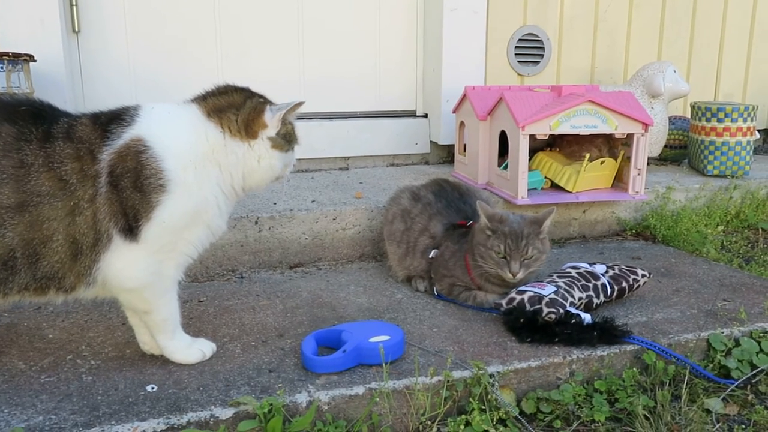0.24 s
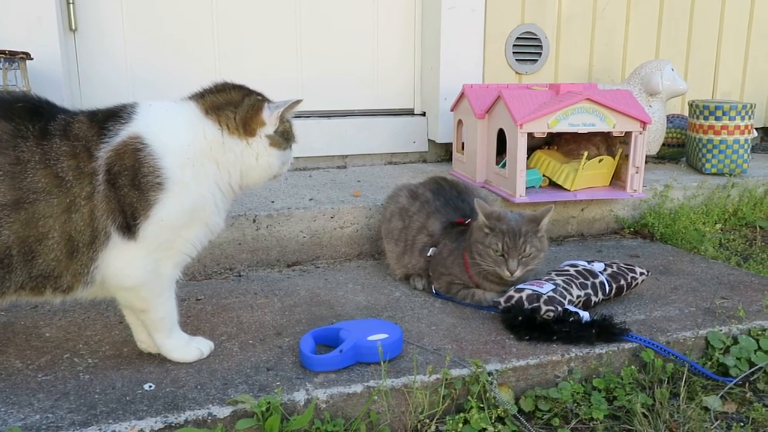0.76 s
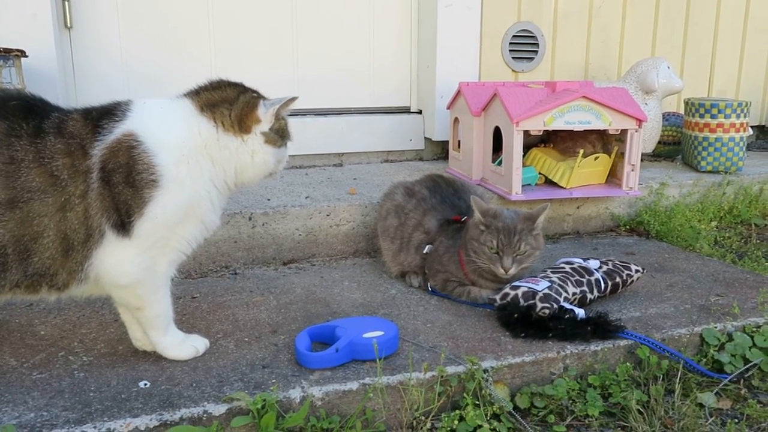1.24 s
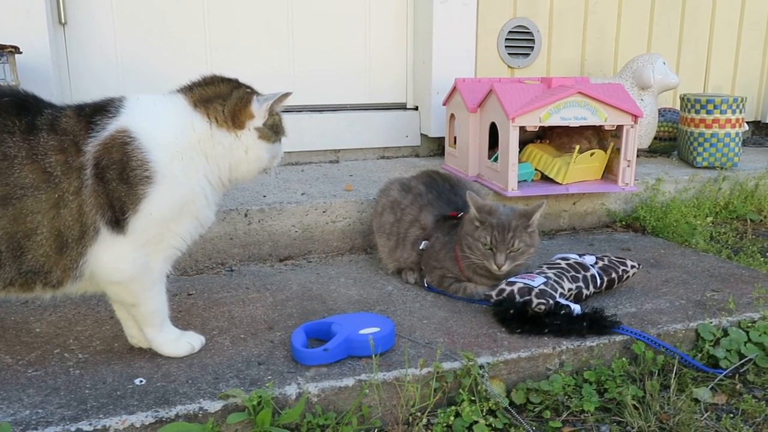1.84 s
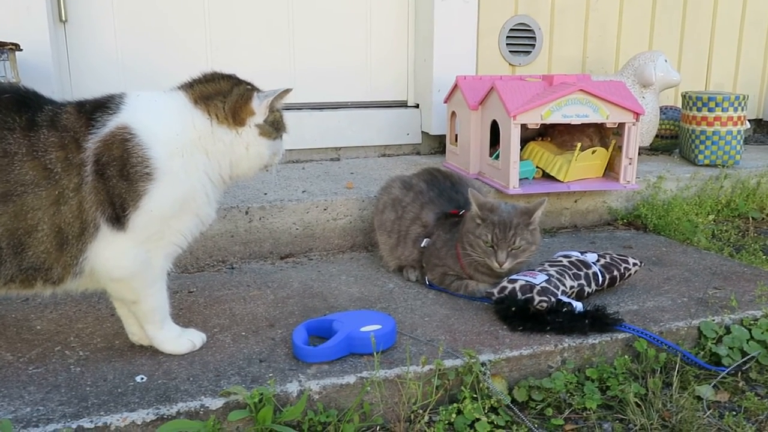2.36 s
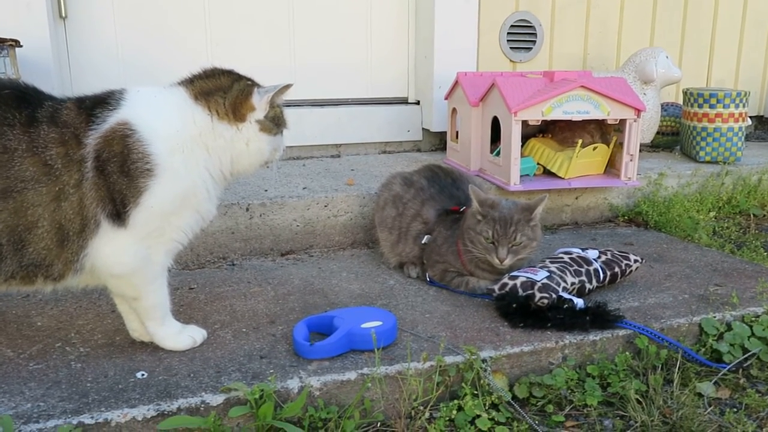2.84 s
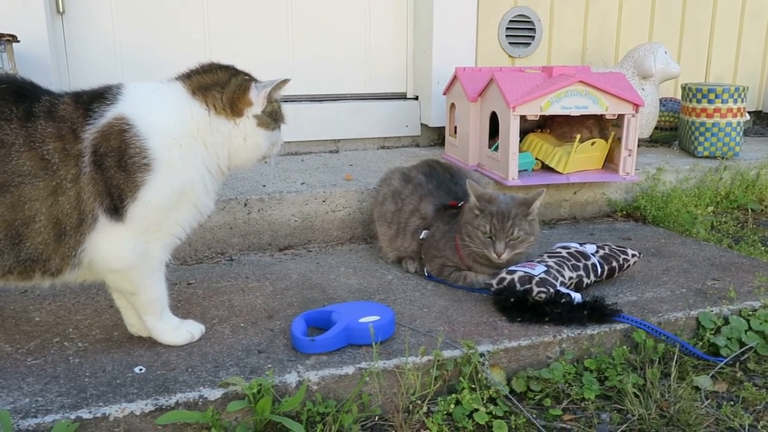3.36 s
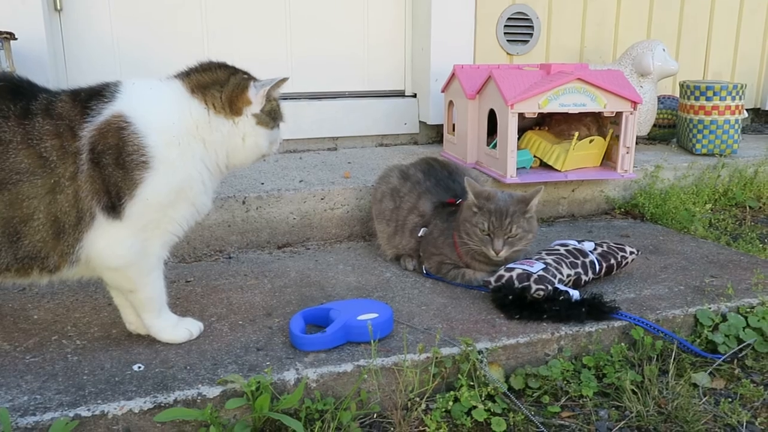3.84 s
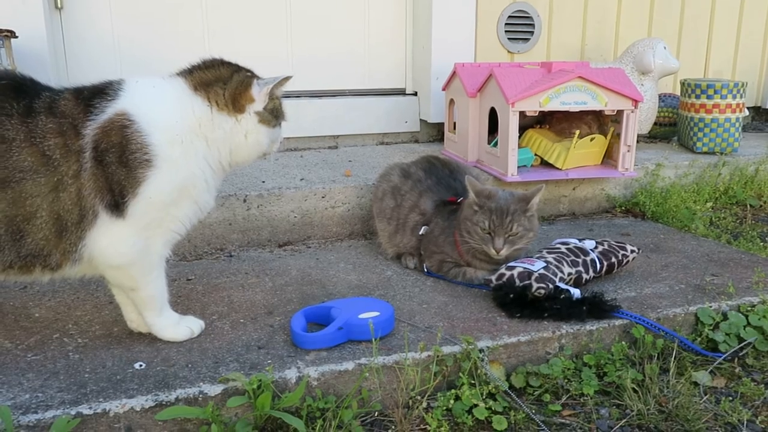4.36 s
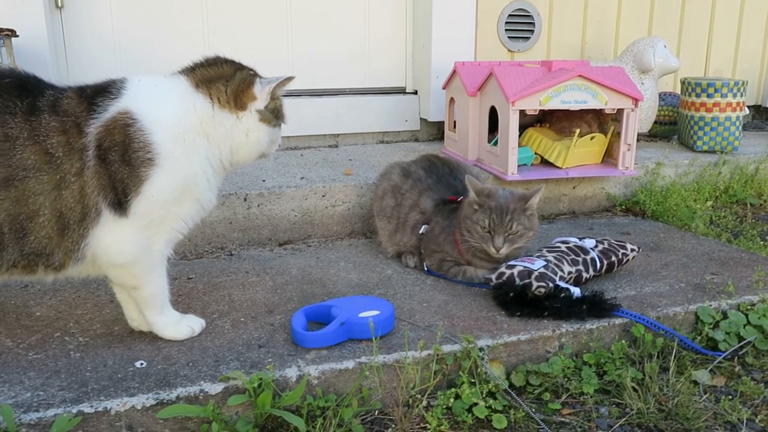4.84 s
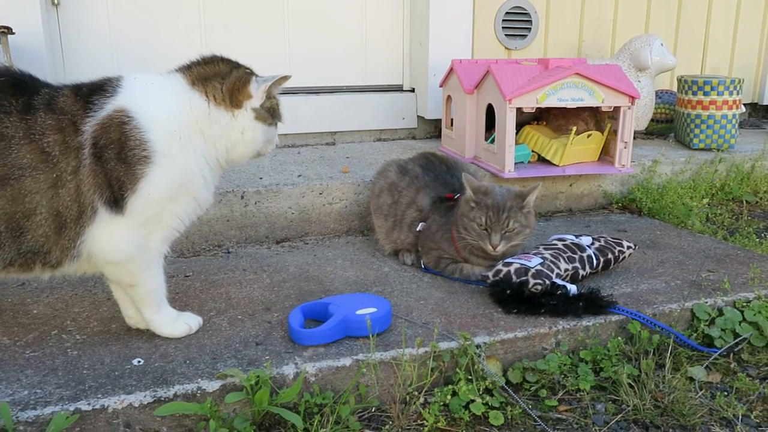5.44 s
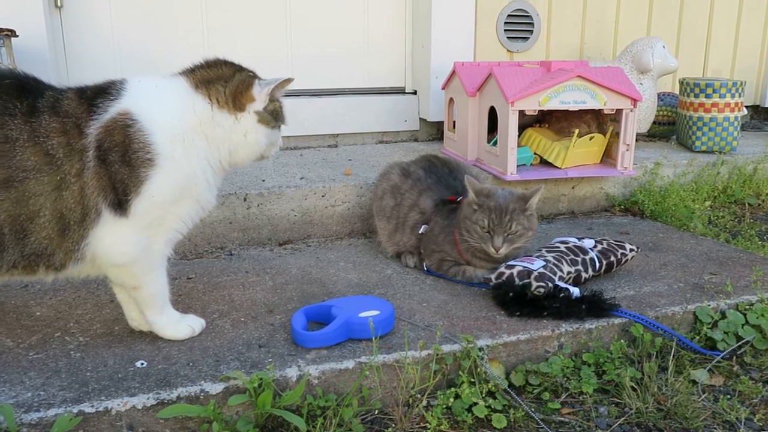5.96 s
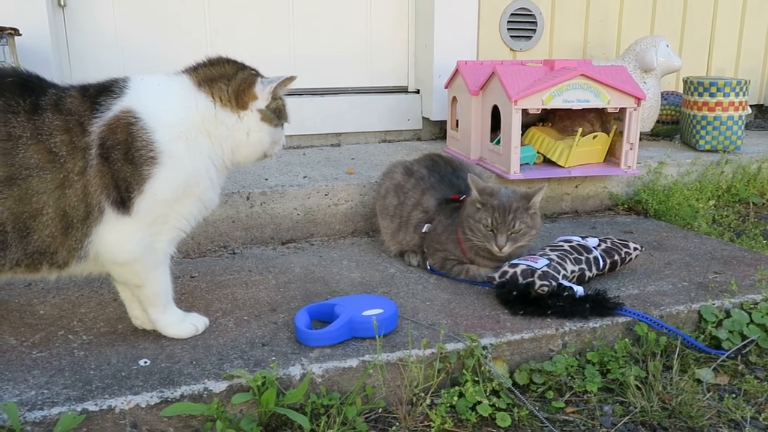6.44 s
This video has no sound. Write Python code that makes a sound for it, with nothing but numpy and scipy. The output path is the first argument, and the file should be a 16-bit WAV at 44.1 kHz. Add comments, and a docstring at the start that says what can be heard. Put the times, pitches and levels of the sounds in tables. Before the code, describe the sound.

Two cats face off on a concrete step: tense raspy wails, a fluttering growl and a humming moan, over wind buffeting and faint birds.

```python
"""Two cats outdoors in a breeze

One cat cries three times on a concrete step: clean harmonics that rasp at each start and flick up at each
end, with air let out as a cry closes. The first cry is already under way at 0 s; the end cuts the third.
A second cat growls (noise puffs ringing a chest) and glides up into a shut-mouthed moan. Wall and step lift
some pitches and cancel others. Wind buffets a two-port microphone over shaped-noise hiss, a thin whine,
gliding bird whistles and grainy rustles."""
import sys
import numpy as np
from scipy import signal
from scipy.fft import rfft, irfft, next_fast_len
from scipy.io import wavfile
from scipy.ndimage import uniform_filter1d, map_coordinates

SR = 44100
rng = np.random.default_rng(int(sys.argv[2]) if len(sys.argv) > 2 else 0)


def file_out(sig):
    """Save sig as 16-bit WAV at sys.argv[1]."""
    # one column per channel
    cols = np.atleast_2d(sig).T
    # limit, then scale
    lim = np.clip(cols, -1, 1)
    pcm = np.round(lim * 32767).astype(np.int16)
    wavfile.write(sys.argv[1], SR, pcm)


N = 295911

ATTACK_S = 0.0091  # swell ahead of each cry


def amp(db):
    """dB to gain."""
    return 10 ** (np.asarray(db) / 20)


def unit(x):
    """Scaled to rms 1."""
    return x / np.sqrt(np.mean(x ** 2) + 1e-20)


def along(points, hz):
    """(Hz, value) points interpolated on a log frequency axis."""
    f, v = np.transpose(points)
    return np.interp(np.log(hz + 1), np.log(f + 1), v)


def curves(rows):
    """One value per sample for each column after the time."""
    s, *cols = np.transpose(rows)
    return [np.interp(np.arange(N) / SR, s, c) for c in cols]


def spans(tables, fade_s):
    """1 while a table runs, 0 between, with soft edges."""
    t = np.arange(N) / SR
    on = sum((t > rows[0][0] - fade_s) & (t < rows[-1][0] + fade_s) for rows in tables) > 0
    return abs(uniform_filter1d(on * 1., round(fade_s * SR) + 1))


def wobble(rate_hz):
    """A smooth random curve, rate_hz knots a second."""
    knots = rng.standard_normal(int(N * rate_hz / SR) + 4)
    return map_coordinates(knots, [np.arange(N) * rate_hz / SR])


def filtered(x, response):
    """x times a complex response of frequency."""
    m = next_fast_len(N + SR // 2)
    return irfft(rfft(x, m) * response(np.fft.rfftfreq(m, 1 / SR)), m)[..., :N]


def resonant(x, modes):
    """x through parallel (Hz, width Hz, dB) resonances of alternating sign."""
    def response(f):
        total = 0
        for k, (centre, width, db) in enumerate(modes):
            damping = 1j * f * width
            total = total + (-1) ** k * amp(db) * damping / (centre ** 2 - f ** 2 + damping)
        return total
    return filtered(x, response)


def rush(spectrum, patchy_db):
    """Noise of rms 1 with time-frequency patches of random gain."""
    z = signal.stft(rng.standard_normal(N), nperseg=512)[2]
    field = rng.standard_normal(z.shape)
    field = uniform_filter1d(uniform_filter1d(field, 6, 0), 12, 1)
    noise = signal.istft(z * amp(patchy_db * unit(field)), nperseg=512)[1][:N]
    return unit(filtered(noise, lambda hz: amp(along(spectrum, hz))))


def echoes(x, wet_db, t60_s):
    """x with the blurred answer of the house wall and the step: a decaying noise tail."""
    t = np.arange(SR // 4) / SR
    tail = rng.standard_normal(len(t)) * amp(-60 * t / t60_s)
    return x + amp(wet_db) * signal.fftconvolve(x, tail / np.linalg.norm(tail))[:N]


def shaped(rows):
    """A cry with its attack before; after it the mouth shuts, pitch flicks up, level releases."""
    attack_db = -28
    shut_s, shut_db = .009, -32  # the mouth closes early in the flick
    flick_s, flick_hz, flick_db = .023, 119.9, 0.5
    release_s, release_db = 0.0262, -23
    (start, hz, db, mouth), (end, last_hz, last_db, _) = rows[0], rows[-1]
    attack = (start - ATTACK_S, hz, db + attack_db, mouth)
    shut = (end + shut_s, last_hz + flick_hz * shut_s / flick_s, last_db, shut_db)
    flick = (end + flick_s, last_hz + flick_hz, last_db + flick_db, shut_db)
    release = (flick[0] + release_s, last_hz + flick_hz / 2, last_db + release_db, shut_db)
    return [attack, *rows, shut, flick, release]


def voice(tables, path, jitter):
    """Pitch, overtone level, cycle angle, gate and makers of clean partials for one cat."""
    pitch_hz, effort_db, mouth_db = curves(np.vstack(tables))
    turn = 2 * np.pi * np.cumsum(pitch_hz * (1 + jitter * wobble(60))) / SR
    sounding = spans(tables, 0.0028)

    def partial(k, db, shake_db):
        level = np.sqrt(2) * amp(db + shake_db * wobble(50))
        return sounding * level * np.cos(k * turn)

    def low(k, shake_db):
        db = effort_db + (k - 1) * mouth_db + along(path, k * pitch_hz)
        return partial(k, db, shake_db)

    return pitch_hz, effort_db + np.minimum(mouth_db, 0), turn, sounding, partial, low


def yowl():
    """Clean fold harmonics; the second is apart, since it reaches the ports from the side."""
    # One table per cry. Each row: time in seconds, pitch in Hz, effort in dB,
    # mouth in dB per overtone step (higher = more open, brighter overtones).
    cries = [
        [(-.4, 550, -50, 0), (0, 547.4, -47.5, 0), (.25, 530.3, -46.5, 0), (.31, 512.4, -44.5, 0),
         (.45, 515.6, -47, 0), (.553, 522.7, -47.5, 0)],
        [(3.778, 646.5, -43, -2.5), (3.792, 624, -46.5, 7), (3.814, 670, -41, -0.5), (3.826, 698, -41, -2.5),
         (3.85, 694, -40, -2), (3.864, 736, -40, -2.5), (3.92, 744.5, -39, -1.5), (4.0, 753, -46.5, -26),
         (4.015, 746, -46.5, -1.5), (4.043, 708, -40.5, -26), (4.06, 652, -46.5, -15), (4.09, 711, -42.5, -32),
         (4.135, 718.6, -47, -34), (4.165, 674, -45.5, -34), (4.25, 585.5, -42.5, -31),
         (4.36, 569.4, -45.5, -19), (4.43, 586.5, -44, -24), (4.54, 564, -46, -8), (4.6, 551, -50, -6),
         (4.633, 566, -50, -10)],
        [(6.602, 623.5, -42, -3), (6.623, 610, -39.5, -1.5), (6.632, 652, -45, 0), (6.642, 671.6, -46, 1.5),
         (6.654, 673, -42, -0.5), (6.664, 716, -38.5, -9), (6.673, 741, -40, -3), (6.71, 740, -41, -2.5)],
    ]
    # Mouth colour of the high overtones. Each row: frequency in Hz, relative level in dB.
    mouth_colour = [(2480, -2), (2780, -13), (3550, -10), (3750, -7), (3950, 0), (4300, 0), (4520, -17),
                    (5150, -13), (6200, -19), (8000, -50)]
    # Gain from throat, wall and step on the low harmonics. Each row: frequency in Hz, gain in dB.
    cry_path = [(513, -11), (546, -0.5), (612, -5.5), (668, 2.5), (706, -15), (728, -1.5), (748, 2),
                (1030, -4.5), (1090, -8.5), (1250, 2.5), (1330, -2.5), (1390, 3.5), (1480, -5), (1545, -18),
                (1640, -4.5), (1870, -9), (1990, 11), (2090, -12.5), (2220, -28)]
    # high overtones relative to the effort, strong only at the start
    rasp_db, rasp_hold_s, rasp_fall_db_per_s, rasp_rest_db = -20.5, 0.075, 350, -39

    voiced = voice([shaped(rows) for rows in cries], cry_path, jitter=.004)
    pitch_hz, bright_db, turn, sounding, partial, low = voiced
    t = np.arange(N) / SR
    starts = np.array([rows[0][0] for rows in cries]) - ATTACK_S
    age_s = t - starts[np.searchsorted(starts, t) - 1]
    fall_db = rasp_fall_db_per_s * np.maximum(age_s - rasp_hold_s, 0)
    high_db = bright_db + np.maximum(rasp_db - fall_db, rasp_rest_db)

    front = low(1, shake_db=0.66) + low(3.001, shake_db=1.36)
    for k in range(4, 11):  # flickering high overtones
        colour_db = along(mouth_colour, k * pitch_hz)
        front += partial(k, high_db + colour_db + 1.5 * wobble(250), shake_db=2.5)
    # air hissing past the folds once a cycle
    air = rush([(500, -20), (1000, 7), (2200, 1)] + mouth_colour, patchy_db=3)
    front += sounding * amp(high_db) * (1 + np.cos(turn)) * air
    return front, low(2, shake_db=1.4)


def wind():
    """Lumpy low noise buffeting, with single pressure dips where an eddy hits the ports."""
    # Each row: time in seconds, buffet level in dB (common part 1 dB below, opposite part 18 dB below).
    buffets = [(0, -55.5), (.5, -49.5), (.98, -43.5), (1.3, -50), (1.58, -54.5), (1.85, -47.5),
               (2.35, -45.5), (2.7, -49), (3.45, -49.5), (4.35, -46.5), (4.65, -50.5), (6.71, -54)]
    # Sharp gusts. Each row: time in seconds (12 ms ahead of the dip's centre),
    # dip size in dB (4.5 dB is added).
    gusts = [(0.663, -40.5), (0.969, -40), (1.811, -41), (2.244, -43), (2.349, -36.5), (3.472, -43.5),
             (3.895, -41), (3.958, -38), (4.161, -40), (4.196, -37.5)]
    # Each row: frequency in Hz, relative density in dB per Hz.
    rumble = [(12, -28.5), (25, -3.5), (40, 3.5), (54, 5.5), (70, -1), (120, -21.5), (250, -68)]

    buffet_db, = curves(buffets)
    thumps = np.zeros(N)
    u = np.arange(-SR // 50, SR // 50) / SR * np.pi * 80
    dip = (1 - 2 * u * u) * np.exp(-u * u)
    for s, db in gusts:
        thumps[round((s - .008) * SR):][:len(u)] -= amp(db + 4.5) * dip

    lumps = unit(amp(1.2 * wobble(14)) * rush(rumble, patchy_db=.3))
    mid = amp(buffet_db - 1) * lumps + thumps
    side_noise = rush([(30, -14.0), (110, 12.5), (250, -34.0)], patchy_db=0.5)
    side = amp(buffet_db - 18.0) * unit(amp(7.8 * wobble(9.7)) * side_noise)
    side += 25 * np.gradient(thumps)  # an eddy passes one port before the other
    return np.array([mid + side, mid - side])


def hiss():
    """Far leaves and traffic as noise, its opposite part stronger in the treble, and a thin whine."""
    # Hiss common to both ports. Each row: frequency in Hz, relative density in dB per Hz.
    far = [(50, -44), (95, 1.5), (300, -4), (420, -6), (780, -10.5), (1700, -16), (5000, -26.5),
           (9500, -36.5), (12000, -45), (14000, -65)]
    # Hiss opposite in the ports. Each row: frequency in Hz, relative density in dB per Hz.
    wide = [(40, -37), (140, -7), (264, -0.5), (400, -1), (740, -6.5), (1200, -6.5), (4500, -17),
            (10000, -28.5), (14000, -29)]
    # Each row: frequency in Hz, level in dB rms (it wavers).
    whine_tones = [(4118, -88.5), (8242, -89.5)]

    mid = amp(-56.5 + 0.083 * wobble(0.55)) * rush(far, patchy_db=1.73)
    side = amp(-57 + 0.64 * wobble(2.11)) * rush(wide, patchy_db=0.0)
    t = np.arange(N) / SR
    whine = np.zeros(N)
    for hz, db in whine_tones:
        level = np.sqrt(2) * amp(db + 1.5 * wobble(7.2))
        whine += level * np.sin(2 * np.pi * hz * t + 1.2 * wobble(15))
    return np.array([mid + side, mid - side]) + whine


def breath():
    """Turbulent, fluttering air through nose and mouth, beginning as the cry closes and outlasting it."""
    # Each row: start in seconds, hold in seconds, level in dB, mouth whistle in dB.
    breaths = [(0.515, 0.34, -62, -10), (4.46, 0.18, -56, 3.5)]
    # Nose resonances. Each row: frequency in Hz, width in Hz, relative level in dB.
    nose = [(890, 155, -0.5), (1470, 180, 2.5), (1735, 134, 2.5), (2338, 88, 1), (3080, 490, -11.5)]
    swell_s, fade_db_per_s = 0.13, 39
    whistle_hz, whistle_width_hz = 2705, 40

    t, out = np.arange(N) / SR, np.zeros(N)
    for s, hold_s, db, whistle_db in breaths:
        fade_db = fade_db_per_s * np.maximum(t - s - swell_s - hold_s, 0)
        level = np.clip((t - s) / swell_s, 0, 1) * amp(db - fade_db)
        eddies = amp(2 * wobble(90)) * rush([(2000, 0)], patchy_db=2)
        modes = sorted(nose + [(whistle_hz, whistle_width_hz, whistle_db)])
        out += level * unit(resonant(eddies, modes))
    return out


def growl():
    """Slow uneven fold flaps, each a puff of noise that rings the chest."""
    # Each row: bout start in seconds, end in seconds, level in dB.
    bout_rows = [(1.46, 1.652, -60), (1.777, 2.258, -55.5), (2.73, 3.213, -59.5), (3.427, 4.096, -58),
                 (4.53, 4.793, -60), (5.306, 6.276, -65)]
    # Each row: frequency in Hz, width in Hz, level in dB (rms scaling cancels it).
    chest = [(317, 80, -11)]

    t = np.arange(N) / SR
    steps = sum(amp(db) * ((t > start) & (t < end)) for start, end, db in bout_rows)
    bouts = uniform_filter1d(steps, round(.08 * SR))
    flaps = np.cumsum(23 * (1 + .15 * wobble(8))) / SR  # about 23 a second
    puffs = (0.6 + np.exp(-5 * (flaps % 1))) * rng.standard_normal(N)
    return bouts * unit(resonant(resonant(puffs, chest), chest))


def birds():
    """Far gliding whistles that flutter in pitch and level, with echoes."""
    # Each row: start in seconds, length in seconds, start pitch in Hz, end pitch in Hz,
    # level in dB before flutter and panning.
    chirps = [(1.46, .07, 4600, 4300, -74), (2.12, .1, 3610, 4020, -69.5), (2.225, 0.047, 3210, 3300, -68),
              (2.315, .035, 3260, 3200, -69.5), (3.355, 0.19, 4960, 3970, -65.5)]

    out, flutter = np.zeros(N), 1 + .012 * wobble(120)
    for s, length_s, start_hz, end_hz, db in chirps:
        first = round(s * SR)
        u = np.linspace(0, 1, round(length_s * SR))
        hz = (start_hz + (end_hz - start_hz) * u) * flutter[first:][:len(u)]
        swell = np.sin(np.pi * u ** 1.4) ** .4
        out[first:][:len(u)] += amp(db) * swell * np.sin(2 * np.pi * np.cumsum(hz) / SR)
    out *= amp(2.5 * wobble(70))
    return echoes(out, wet_db=-6.0, t60_s=0.32)


def moan():
    """A hummed glide: the fundamental and two fluttering overtones."""
    # Each row: time in seconds, pitch in Hz, effort in dB, mouth in dB per overtone step.
    glide = [(1.635, 124.9, -55, -6), (1.65, 145.7, -47, -7), (1.675, 155, -44, -4.5),
             (1.705, 209, -47.5, -2.5), (1.72, 298.5, -43, -28), (1.75, 406, -44.5, -28),
             (1.78, 518, -45.5, -27), (1.86, 652, -43.5, -37), (1.89, 671, -44, -17),
             (1.96, 703.6, -43, -26), (2.05, 725.4, -42, -25), (2.19, 735, -47.5, -17),
             (2.39, 728, -43, -19.5), (2.5, 707, -42.5, -23), (2.63, 664, -42, -25), (2.8, 613.4, -46, -20),
             (2.91, 582, -48, -19.5), (2.945, 543, -52, -19), (2.975, 530, -59, -20)]
    # Gain from throat, wall and step. Each row: frequency in Hz, gain in dB.
    moan_path = [(120, -3), (210, 13), (300, -3.5), (410, 10), (524, -6.5), (638, -2.5), (660, -7),
                 (677, -18.5), (692, -5), (704, -1), (740, -6), (1095, 7.5), (1200, -1.5), (1265, -7),
                 (1310, 2), (1340, -2.5)]
    low = voice([glide], moan_path, jitter=0.0016)[-1]
    return low(1, shake_db=1.2) + low(2, shake_db=1.2) + low(3, shake_db=4) / 2


def rustles():
    """Short soft puffs of grainy noise."""
    # Each row: centre in seconds, level in dB before graininess.
    puff_rows = [(4.084, -67), (4.16, -66), (4.23, -65), (4.3, -67), (4.395, -66)]
    # Each row: frequency in Hz, relative density in dB per Hz.
    colour = [(600, -25), (1500, -4), (3450, -8), (3750, -2), (4100, -8), (5500, -19), (9000, -65)]
    t = np.arange(N) / SR
    shape = sum(amp(db) * np.exp(-((t - s) / 0.027) ** 2) for s, db in puff_rows)
    return shape * amp(2.4 * wobble(300)) * rush(colour, patchy_db=3)


def scene():
    """The cats in front, birds off to one side."""
    front, second = yowl()
    near = echoes(front, wet_db=-16, t60_s=0.15) + echoes(moan(), wet_db=-15, t60_s=0.2)
    # the second harmonic leans to one side: dB per port
    sideways = echoes(second, wet_db=-11.5, t60_s=0.19) * amp([[1.6], [-1.6]])
    cat = near + sideways + breath()
    panned_birds = birds() * np.array([[2], [-.2]])
    return cat + growl() + rustles() + panned_birds + wind() + hiss()


def record(dry):
    """Nothing passes above the band limit; a small constant offset is added."""
    top_hz = 14200
    return filtered(dry, lambda hz: hz < top_hz) + 0.00024


dry = scene()
out = record(dry)
file_out(out)
```